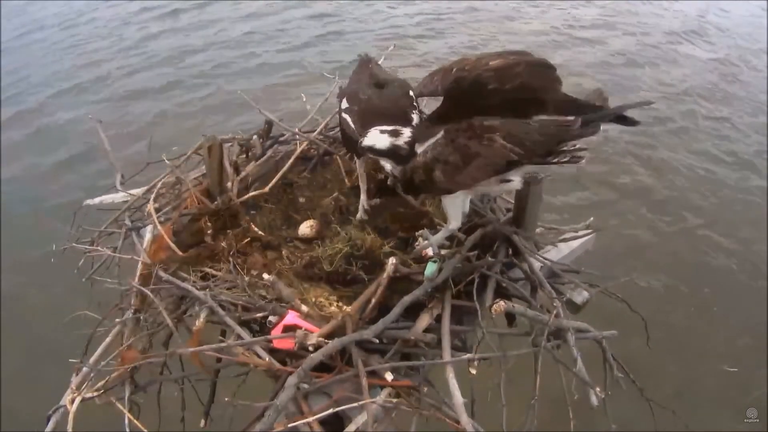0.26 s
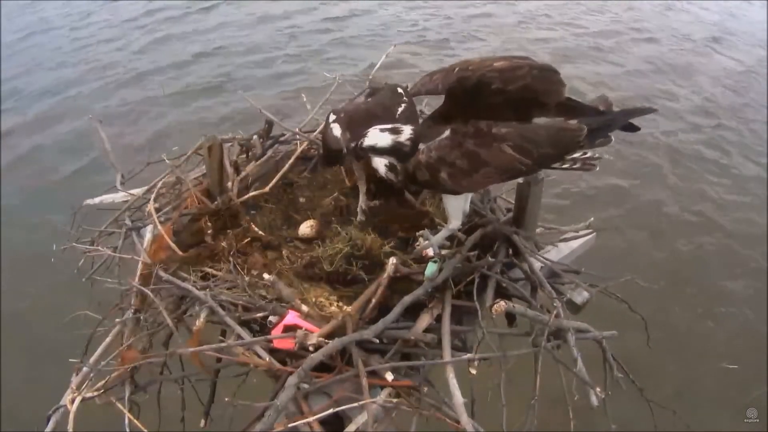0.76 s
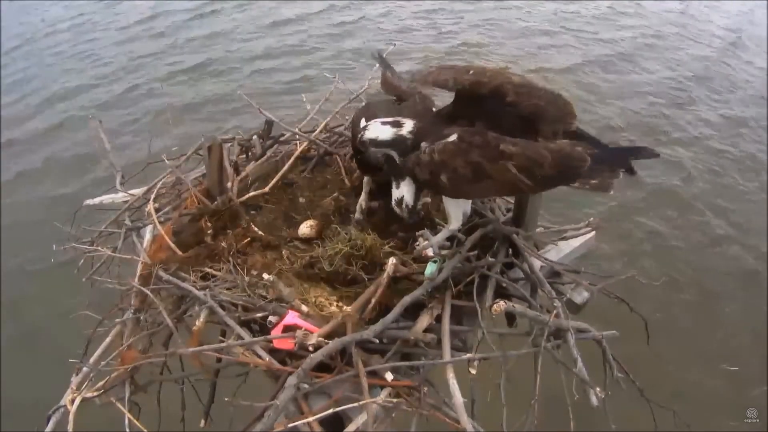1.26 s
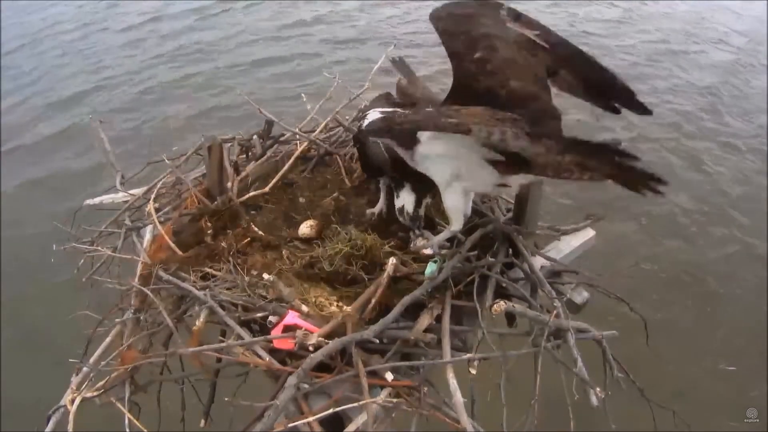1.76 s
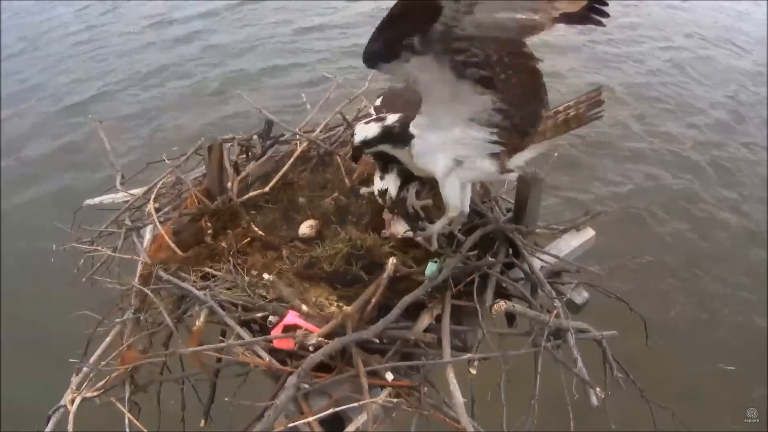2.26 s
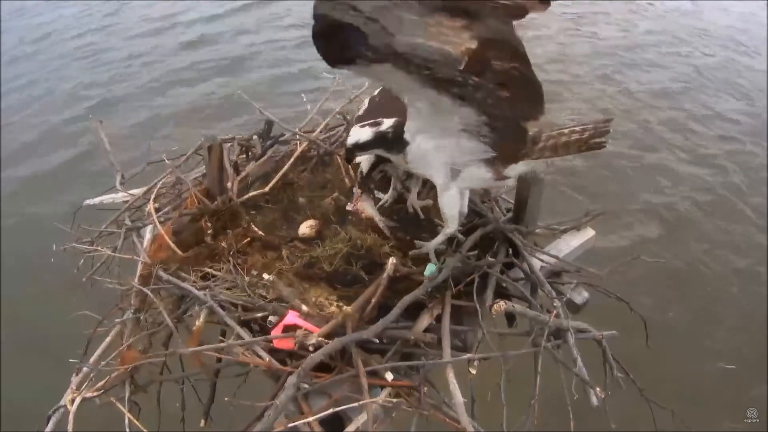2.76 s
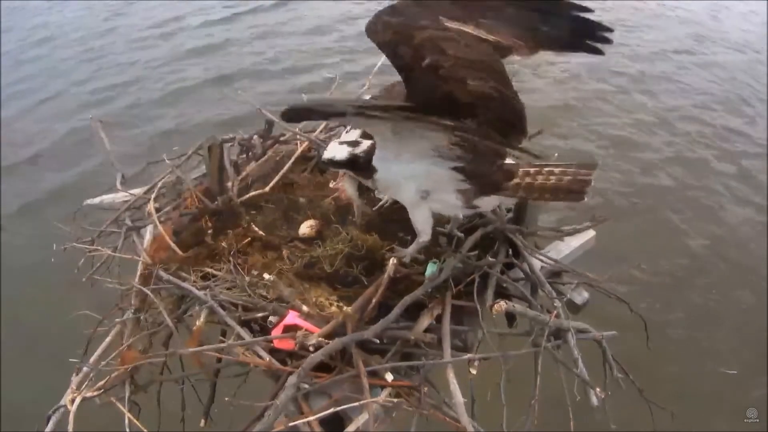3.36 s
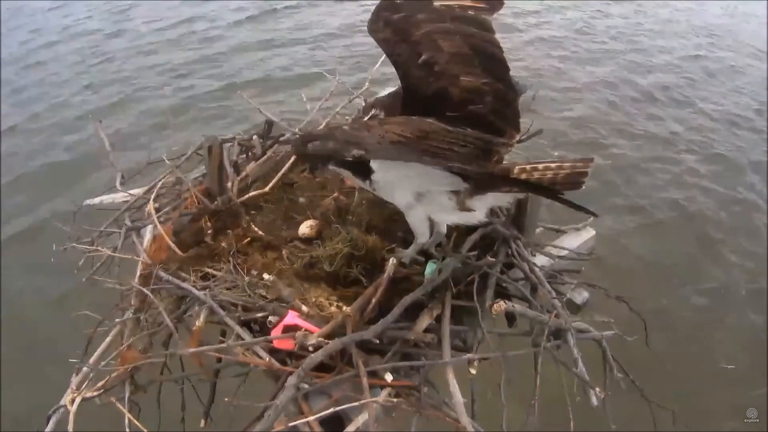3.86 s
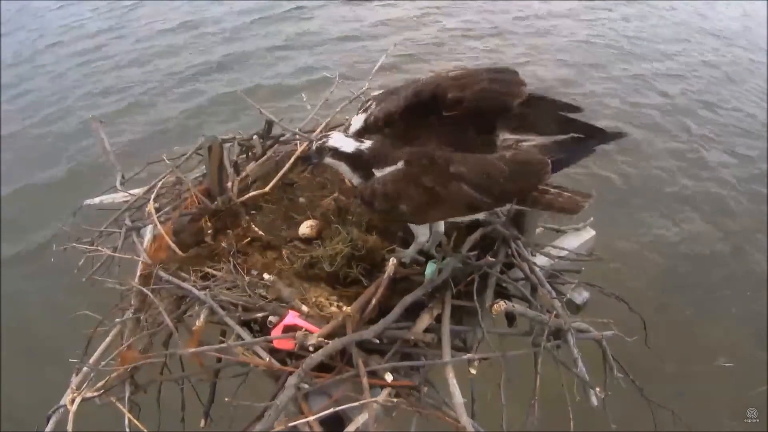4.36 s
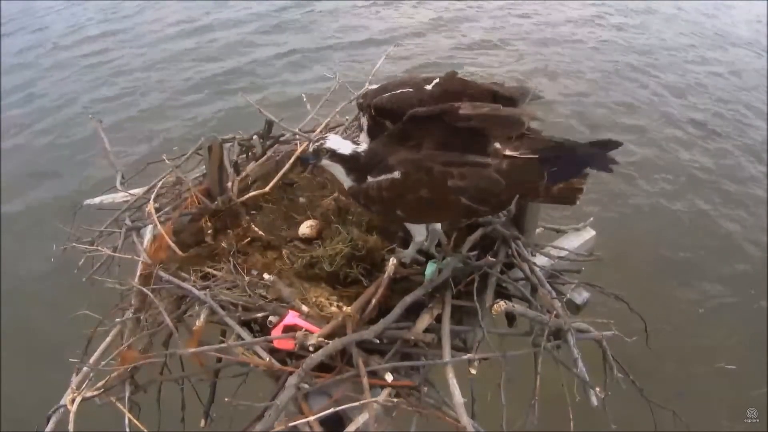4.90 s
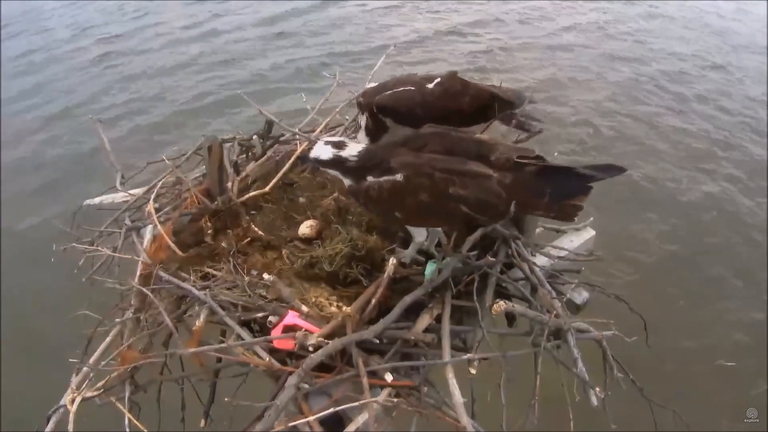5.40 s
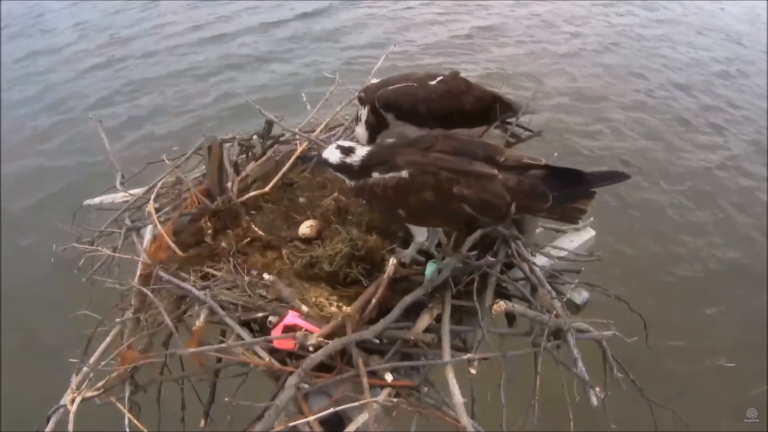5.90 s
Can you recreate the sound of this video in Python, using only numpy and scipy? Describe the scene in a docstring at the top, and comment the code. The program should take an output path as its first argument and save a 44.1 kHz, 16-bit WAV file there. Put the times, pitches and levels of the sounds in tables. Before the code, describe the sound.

Ospreys call from a stick nest above open water, close to a small camera microphone. A fast run of sharp, high chirps comes first, then a brief pause and a few more. Five slower, longer whistles follow, each cracking into a rasp and ending in a short falling yelp, the last one weaker. Soft wingbeats and a few faint twig ticks sound underneath, over a low, steady breeze and hiss.

```python
"""Two ospreys call from a stick nest above open water, close to a small nest camera.
Air pushed through the voice box makes fast, sharp chirps, then long whistles (a tone plus its octave)
that crack into a rasp and end in a falling yelp. Wings beat and twigs tick over a low breeze.
The camera's housing rings faintly, and its sound drops out now and then."""
import sys
import numpy as np
from scipy import signal
from scipy.fft import rfft, irfft
from scipy.io import wavfile

SR = 44100
rng = np.random.default_rng(int(sys.argv[2]) if len(sys.argv) > 2 else 0)


def master(y):
    """Save y as 16-bit WAV."""
    cut = np.clip(np.atleast_2d(y).T, -1, 1)
    pcm = np.round(cut * 32767)  # scale
    wavfile.write(sys.argv[1], SR, pcm.astype(np.int16))


N = 270774
TIME = np.arange(N) / SR
FREQS = np.arange(N // 2 + 1) * SR / N


def chirps(jitter=0.037, flutter_db=7.0, shimmer_db=0.5, lock_db=9, octave_db=-7, octave_below_hz=3000):
    """The voice box sings short notes: pure when the tone is strong, shaky when rushing air takes over."""
    out = np.zeros(N)
    waver, flutter = wander(rate_hz=740), wander(rate_hz=210)
    flow_db = airflow()
    for span, fade, hz, db in [*peeps(), *slides()]:
        shaky = 1 / (1 + undb(db - flow_db[span] - lock_db))  # 0 is pure, 1 is broken
        phase = 2 * np.pi * np.cumsum(hz * (1 + jitter * shaky * waver[span])) / SR
        # the throat lets overtones through on low notes only
        overtones = undb(octave_db) / (1 + (hz / octave_below_hz) ** 16)
        tone = np.sin(phase) + overtones * (np.sin(2 * phase) + undb(-14) * np.sin(3 * phase))
        tremble_db = (shimmer_db + flutter_db * shaky) * flutter[span]
        out[span] += np.sqrt(2) * fade * undb(db + tremble_db) * tone
    return out


# high notes of the chirps: (time [s], length [s], top pitch [Hz], mid level [dB], start-to-end rise [dB])
HIGH_NOTES = [(0.078, 0.038, 4540, -37.5, 14.5), (0.154, 0.057, 4790, -30.5, 3),
              (0.308, 0.039, 4536, -34, -3.5), (0.402, 0.055, 4814, -24.5, -3.5),
              (0.648, 0.064, 4830, -26, -6), (.807, 0.017, 4490, -35.5, -1),
              (.865, 0.017, 4490, -27.5, -4.5), (0.885, 0.041, 4680, -33.5, -5),
              (1.034, 0.03, 4480, -33, 0), (1.115, 0.035, 4506, -27.5, 19), (1.148, 0.051, 4690, -29, -19),
              (1.295, 0.019, 4440, -41, -6), (1.398, 0.089, 5220, -43.5, 4)]


def peeps(drop_hz=455, drop_s=0.03, edge_db=19.5):
    """Pitch and level rise and fall in an arch; the pitch is drop_hz lower at drop_s from the top."""
    for s, length, top_hz, db, rise_db in HIGH_NOTES:
        span, progress, fade = note(s - length / 2, s + length / 2, fade_s=0.003)
        hz = top_hz - drop_hz * ((TIME[span] - s) / drop_s) ** 2
        arch_db = -edge_db * abs(2 * progress - 1) ** 2.23
        yield span, fade, hz, db + rise_db * (progress - 0.5) + arch_db


# quick slides around the peeps:
# (time [s], rise [s], fall [s], first pitch [Hz], last pitch [Hz], peak level [dB])
SLIDING_NOTES = [(0.194, 0.016, 0.014, 3070, 2520, -60.5), (.275, 0.0072, 0.012, 2840, 2990, -49.5),
                 (0.345, 0.012, 0.013, 4620, 5120, -41.5), (0.366, 0.023, 0.0068, 4400, 3040, -42.5),
                 (.443, 0.034, .014, 3300, 2520, -52), (.523, 0.016, 0.017, 2690, 2920, -44.5),
                 (0.598, 0.018, 0.0092, 5500, 4450, -36.5), (.611, 0.02, 0.007, 4100, 3110, -43),
                 (.693, .01, 0.0075, 2970, 2630, -58), (.789, .01, 0.0097, 4780, 5500, -57),
                 (.833, 0.014, .011, 4300, 3860, -52.5), (.849, 0.01, 0.0085, 3770, 3130, -50.5),
                 (0.92, 0.019, 0.014, 3100, 2600, -54), (1.004, 0.0092, 0.01, 2790, 3020, -41),
                 (1.074, 0.014, 0.014, 4150, 3800, -39), (1.089, 0.0086, .008, 3590, 3120, -44),
                 (1.184, 0.015, 0.015, 2910, 2536, -41), (1.264, 0.0086, 0.012, 2800, 2995, -37.5),
                 (1.28, .008, .008, 4930, 5480, -52), (1.334, 0.024, 0.017, 4230, 4010, -45),
                 (1.365, 0.041, 0.018, 4160, 4520, -39.5), (1.458, 0.021, 0.018, 2860, 2430, -46.5),
                 (1.722, 0.0084, 0.026, 2720, 2415, -45.5), (1.913, 0.0089, 0.014, 4090, 3080, -44),
                 (1.988, .013, 0.0098, 4000, 3360, -51), (2.001, 0.011, 0.028, 2647, 2430, -32.5),
                 (2.147, 0.0054, 0.029, 2520, 3080, -34), (2.206, 0.017, 0.012, 5050, 6450, -44),
                 (2.241, 0.0079, 0.02, 4170, 4000, -42), (2.257, 0.011, .007, 3720, 3000, -37),
                 (2.322, .007, 0.012, 3310, 2930, -39), (2.335, 0.0042, 0.013, 2720, 2493, -26),
                 (3.051, 0.0041, 0.011, 2670, 2420, -54)]


def slides(bend=1.4):
    """The pitch slides quickly, then settles, while the level climbs to a point and falls."""
    for s, rise, fall, first_hz, last_hz, db in SLIDING_NOTES:
        span, progress, fade = note(s - rise, s + fall, fade_s=0.0032)
        hz = last_hz + (first_hz - last_hz) * (1 - progress) ** bend
        yield span, fade, hz, db + peak_shape(TIME[span] - s, rise, fall)


def whistles():
    """Long, clean notes with a strong octave; the yelps that end them are rougher."""
    clean = tone_and_octave([*lead_ins(), *held_notes()], jitter=0.002, flutter_db=0.84)
    return clean + tone_and_octave(yelps(), jitter=0.011, flutter_db=2.85)


def tone_and_octave(notes, jitter, flutter_db):
    """Play each note with its octave (twice the pitch), a little unsteady in pitch and level."""
    out = np.zeros(N)
    waver, flutter = wander(rate_hz=840), wander(rate_hz=100)
    for span, fade, hz, db, octave_db in notes:
        phase = 2 * np.pi * np.cumsum(hz * (1 + jitter * waver[span])) / SR
        tone = undb(db) * np.sin(phase) + undb(octave_db) * np.sin(2 * phase)
        out[span] += np.sqrt(2) * fade * undb(flutter_db * flutter[span]) * tone
    return out


# low note that opens each whistle: (time [s], pitch [Hz], peak level [dB], octave level [dB])
OPENING_NOTES = [(2.587, 2010, -43.5, -44.5), (3.204, 2060, -36, -41), (3.773, 2197, -40.5, -68),
                 (4.419, 2137, -37.5, -51), (5.746, 2030, -47.5, -58)]


def lead_ins(rise_s=0.013, fall_s=0.0075, climb_hz_per_s=9000):
    """A brief rising note before the voice jumps up to the whistle."""
    for s, hz, db, octave_db in OPENING_NOTES:
        span, _, fade = note(s - rise_s, s + fall_s)
        t = TIME[span] - s
        shape_db = peak_shape(t, rise_s, fall_s)
        yield span, fade, hz + climb_hz_per_s * t, db + shape_db, octave_db + shape_db


# one list of points for each whistle: (time [s], pitch [Hz], level [dB], octave level [dB])
WHISTLE_PATHS = [
    [(2.592, 2900, -41.5, -44), (2.598, 2793, -42.5, -47), (2.638, 2843, -51.0, -37.5),
     (2.668, 2832, -43.5, -39.0), (2.714, 2933, -36, -43.0), (2.762, 2950, -38.0, -46),
     (2.772, 2998, -40.0, -37.5), (2.802, 3029, -42, -38.5), (2.82, 3121, -38, -58)],
    [(3.211, 2850, -43, -46.5), (3.237, 2912, -40.5, -43.5), (3.267, 2897, -42.5, -45),
     (3.293, 2844, -43.5, -55), (3.367, 2901, -41, -46.5), (3.399, 2944, -44, -51.5),
     (3.419, 3040, -48, -41), (3.475, 3068, -41, -49.5), (3.489, 3240, -45, -66)],
    [(3.777, 2850, -45, -49.5), (3.793, 2916, -47.5, -43.5), (3.821, 2950, -45, -50.5),
     (3.855, 2897, -47, -43), (3.869, 2867, -44.5, -50), (3.891, 2876, -42.5, -50), (3.959, 2904, -50, -44),
     (3.975, 3030, -48, -37.5), (3.983, 3020, -56, -57)],
    [(4.427, 2850, -42, -45.5), (4.445, 2900, -42, -40.5), (4.489, 2826, -41, -44),
     (4.605, 2944, -44.0, -57.5), (4.611, 2963, -44, -49), (4.669, 3038, -46.5, -35.5),
     (4.689, 3046, -43.5, -39), (4.701, 3088, -35.5, -43.5), (4.711, 3208, -44.5, -54)],
    [(5.757, 2794, -47.5, -59.5), (5.769, 2806, -40.5, -54.5), (5.789, 2840, -43, -53.5),
     (5.821, 2796, -40.5, -54.5), (5.845, 2805, -38.0, -48), (5.865, 2858, -41, -61.5),
     (5.881, 2922, -50, -45), (5.937, 2967, -61, -56.5), (6.007, 2992, -58.5, -61.5)],
]


def held_notes(edge_s=0.005):
    """The long part of each whistle creeps up in pitch as the pressure builds."""
    for path in WHISTLE_PATHS:
        times, *columns = np.transpose(path)
        span, _, fade = note(times[0] - edge_s, times[-1] + edge_s, edge_s)
        hz, db, octave_db = (np.interp(TIME[span], times, column) for column in columns)
        yield span, fade, hz, db, octave_db


# yelp that ends each whistle:
# (time [s], rise [s], fall [s], peak level [dB], octave level [dB], airflow [dB])
CLOSING_YELPS = [(2.871, .021, 0.039, -35, -36.5, -47.5), (3.579, .011, 0.034, -38, -34, -51.5),
                 (4.114, .004, 0.035, -37.5, -36.5, -50.5), (4.815, .014, .033, -36, -36, -57),
                 (6.138, 0.0079, 0.021, -44.5, -55, -58.5)]


def yelps(from_hz=2906, to_hz=2728, bend=1.35):
    """The voice catches again and drops as the pressure goes; the octave swells more briefly."""
    for s, rise, fall, db, octave_db, _ in CLOSING_YELPS:
        span, _, fade = note(s - rise, s + fall)
        t = TIME[span] - s
        hz = to_hz + (from_hz - to_hz) * np.maximum(1 - t / fall, 0) ** bend
        before, after = np.maximum(-t / rise, 0), np.maximum(t / fall, 0) ** 3
        yield span, fade, hz, db - 11 * before - 16.5 * after, octave_db - 22 * before - 34.5 * after


# hoarse tones: (start [s], end [s], pitch [Hz], width [Hz], level [dB])
HOARSE_TONES = [(0.53, 0.572, 4340, 302, -48), (2.147, 2.203, 3100, 300, -50),
                (2.21, 2.252, 5700, 600, -45.5), (2.276, 2.317, 4900, 500, -62),
                (2.606, 2.76, 4770, 170, -55.5), (2.81, 2.868, 3100, 111, -49.5),
                (2.815, 2.87, 4040, 240, -52), (2.778, 2.87, 4530, 110, -54), (3.486, 3.58, 3240, 80, -54),
                (3.488, 3.579, 4136, 120, -50), (3.983, 4.113, 3220, 90, -58),
                (3.986, 4.057, 3994, 109, -49), (4.049, 4.116, 4075, 110, -45),
                (4.709, 4.817, 3240, 80, -55), (4.712, 4.818, 4220, 168, -50),
                (4.725, 4.816, 4700, 202, -55), (5.928, 6.14, 4780, 90, -66),
                (6.007, 6.149, 3900, 160, -63.5), (5.964, 6.16, 2980, 302, -64.5)]


def cracks():
    """Blown too hard, the voice breaks into unsteady tones at unrelated pitches."""
    return sum(undb(db) * gate(TIME, start, end, fade_s=0.0096) * noise(abs(resonance(hz, 2 * w)) ** 3)
               for start, end, hz, w, db in HOARSE_TONES)


# set pitches that colour the rasp:
# (pitch [Hz], rough width [Hz], relative level in chirps [dB], relative level in whistles [dB])
RASP_RINGS = [(2068, 86, -20.5, 1), (2326, 670, -20.5, -8), (2406, 60, -6.5, 4.5), (2720, 250, -11, -21.5),
              (3178, 200, -2, -5.5), (3777, 120, -2.5, -13), (4003, 150, -4.5, -5), (4472, 61, 6, -3.5),
              (4790, 130, -1, -7.5), (4990, 140, -6, -9), (5404, 270, -0.5, -6.5), (5834, 220, -7, -0.5),
              (6080, 110, -4.5, -9), (6350, 460, -16.5, -13.5), (6890, 210, -4, -6.5),
              (7160, 360, -17, -18.5), (7620, 300, -13.5, -20.5)]


def rasp(chirp_db=1, whistle_db=2, chirp_grain_db=3, whistle_grain_db=2, whistles_from_s=2.5):
    """The birds' breathy rasp, coloured by the camera's case ringing at set pitches."""
    pitches, widths, *levels = np.transpose(RASP_RINGS)
    shapes = np.array([abs(resonance(hz, 2 * width)) ** 10 for hz, width in zip(pitches, widths)])
    # brighter and grainier in the chirps than in the whistles
    bright, dark = (noise(np.sqrt(undb(db) ** 2 @ shapes)) for db in levels)
    grain = wander(rate_hz=135)
    bright = bright * undb(chirp_db + chirp_grain_db * grain)
    dark = dark * undb(whistle_db + whistle_grain_db * grain)
    return undb(airflow()) * np.where(TIME < whistles_from_s, bright, dark)


def airflow():
    """How hard the breath rushes, in dB: the strongest puff or stream at each moment."""
    return np.max([*puffs(), *streams()], axis=0)


# breaths that drive the chirps: (time [s], rise [s], fall [s], peak airflow [dB])
CHIRP_BREATHS = [(.16, 0.043, 0.031, -56), (.3, 0.029, 0.018, -60.5), (.363, 0.017, 0.023, -53.5),
                 (.41, 0.051, 0.033, -51), (.527, 0.012, 0.047, -57), (.608, 0.038, .024, -49),
                 (0.654, 0.056, 0.033, -49.5), (.878, 0.035, 0.037, -54.5), (1.01, .012, 0.043, -52.5),
                 (1.088, 0.029, 0.018, -50), (1.151, .052, 0.03, -49), (1.265, 0.014, 0.088, -59),
                 (1.39, 0.047, 0.064, -53.5), (1.91, 0.0065, 0.0078, -46.5), (1.997, 0.0093, 0.01, -46),
                 (2.152, 0.0059, 0.022, -52.5), (2.25, 0.066, 0.069, -52.5), (2.32, 0.062, 0.023, -45.5)]


def puffs(edge_db=10):
    """Each short puff of air swells to a rounded peak and dies away."""
    for s, rise, fall, db in CHIRP_BREATHS:
        yield db - edge_db * np.maximum((s - TIME) / rise, (TIME - s) / fall) ** 2


# breath behind each whistle: (airflow at the start [dB], airflow just before the yelp [dB])
WHISTLE_BREATHS = [(-51, -58.5), (-53.5, -60), (-55, -60.5), (-53.5, -56), (-66.5, -70.5)]


def streams(push_s=0.013, rise_db_per_s=1199, fall_db_per_s=646.5):
    """A long breath weakens through each whistle, then gives a last push for the yelp."""
    def stream(start, end, db):
        early, late = np.maximum(start - TIME, 0), np.maximum(TIME - end, 0)
        return db - rise_db_per_s * early - fall_db_per_s * late
    for path, sag_db, yelp in zip(WHISTLE_PATHS, WHISTLE_BREATHS, CLOSING_YELPS):
        start_s = path[0][0]
        yelp_s, _, fall, _, _, push_db = yelp
        yield stream(start_s, yelp_s, np.interp(TIME, (start_s, yelp_s), sag_db))
        yield stream(yelp_s - push_s, yelp_s + fall / 2, push_db)


def surroundings(voice, ring_db=-11, echo_db=-24, echo_s=0.018):
    """The camera mount rings on after low notes; sticks and water scatter a very short echo."""
    tail = rng.standard_normal(N) * np.exp(-TIME / echo_s) * (TIME > 0.003)
    echo = undb(echo_db) * rfft(tail / np.sqrt(np.sum(tail ** 2)))
    mount = undb(ring_db) * resonance(hz=2550, width_hz=9)
    return irfft(rfft(voice) * (1 + mount + echo), N)


# wing strokes: (time [s], swell time [s], centre pitch [Hz], peak level [dB])
WING_STROKES = [(1.85, 0.39, 36, -64.5), (1.95, 0.096, 241, -66), (2.399, 0.04, 250, -62.5),
                (2.421, 0.13, 42, -61.5), (2.624, 0.046, 263, -60.5), (2.623, 0.039, 800, -65),
                (2.713, 0.15, 38, -60.5), (3.501, 0.23, 40, -61.5), (3.615, 0.022, 218, -50.5),
                (4.125, 0.057, 43.5, -49.5), (4.92, 0.059, 34, -60)]


def wings():
    """Each stroke pushes a soft, low swell of swirling air at the microphone."""
    return sum(undb(db) * swell(s, swell_s) * noise(abs(resonance(hz, 0.54 * hz)) ** 1.7)
               for s, swell_s, hz, db in WING_STROKES)


# twigs under the birds' claws: (time [s], level [dB])
TWIG_TICKS = [(1.684, -58), (1.762, -60.5), (2.612, -53), (3.03, -76), (3.047, -58), (3.602, -51.5),
              (3.689, -67)]


def twigs(decay_s=0.01):
    """Dry sticks shift with short, dull ticks."""
    ticks = sum(undb(db) * (TIME > s) * np.exp(-abs(TIME - s) / decay_s) for s, db in TWIG_TICKS)
    return ticks * noise(abs(resonance(hz=2000, width_hz=5000)))


# breeze, water and hiss, from low to high: (frequency [Hz], relative level [dB])
AIR_COLOUR = [(10, -18.5), (24, -4.5), (36, 8), (52, -2.5), (72, 0), (105, -3.5), (200, -6), (400, -12),
              (700, -17), (1100, -17.5), (1800, -23), (2800, -21.5), (3800, -26), (6400, -24.5),
              (7400, -26.5)]


def breeze(level_db=-59.5, gust_db=-0.2, bass_below_hz=450):
    """A breeze over the water swells very slightly in the bass, under a steady hiss."""
    hz, db = np.transpose(AIR_COLOUR)
    colour = undb(np.interp(np.log(FREQS + 1), np.log(hz), db))
    spectrum = rfft(noise(colour))
    bass = 1 / (1 + (FREQS / bass_below_hz) ** 2)
    rumble = irfft(spectrum * bass, N) * undb(gust_db * wander(rate_hz=2.7))
    hiss = irfft(spectrum * (1 - bass), N)
    return undb(level_db) * (rumble + hiss)


# pitches at which the camera's case rings: (pitch [Hz], width [Hz], relative level [dB])
HOUSING_RINGS = [(1214, 34, -1), (1619, 23, -4.5), (2027, 27, -11.5), (2460, 25, -11.5), (2833, 100, -13),
                 (3140, 25, -5.5), (4760, 340, -21), (5500, 380, -16)]


def housing(level_db=-69, brush_at_s=1.97, brush_db=13):
    """The camera's case gives a faint, hollow ring, louder for a moment when a wing brushes the mount."""
    power = sum(abs(undb(db) * resonance(hz, width)) ** 2 for hz, width, db in HOUSING_RINGS)
    return undb(level_db + brush_db * swell(brush_at_s, swell_s=0.02)) * noise(np.sqrt(power))


def note(start, end, fade_s=0.0014):
    """A note's sample numbers, its progress from 0 to 1, and its fade in and out."""
    span = np.flatnonzero((TIME > start) & (TIME < end))
    return span, (TIME[span] - start) / (end - start), gate(TIME[span], start, end, fade_s)


def peak_shape(t, rise_s, fall_s, edge_db=14.5):
    """Level in dB of a short note that grows until t = 0 and then dies away."""
    return -edge_db * np.maximum(-t / rise_s, t / fall_s) ** 1.22


def swell(s, swell_s):
    """A bell-shaped rise and fall around time s."""
    return np.exp(-((TIME - s) / swell_s) ** 2)


def gate(t, start, end, fade_s):
    """1 between start and end, 0 outside, with rounded edges."""
    return np.sin(np.pi / 2 * np.clip(np.minimum(t - start, end - t) / fade_s, 0, 1)) ** 2


def resonance(hz, width_hz):
    """A filter that rings at one pitch, where its gain is 1; narrower rings longer."""
    return 1j * FREQS * width_hz / (hz ** 2 - FREQS ** 2 + 1j * FREQS * width_hz)


def noise(gain):
    """Noise shaped by a gain at each frequency, then scaled to a typical size (rms) of 1."""
    shaped = irfft(rfft(rng.standard_normal(N)) * gain, N)
    return shaped / np.sqrt(np.mean(shaped ** 2))


def wander(rate_hz):
    """A smooth random wobble of typical size 1, moving up to about rate_hz."""
    return noise(np.exp(-(FREQS / rate_hz) ** 2))


def undb(db):
    """Turn decibels into a number to multiply by."""
    return 10 ** (np.asarray(db) / 20)


def scene():
    """The ospreys' calls, with wings, twigs, open air and the ringing case, in one channel."""
    voice = chirps() + whistles() + cracks() + rasp()
    return (surroundings(voice) + wings() + twigs() + breeze() + housing())[None]


# gaps in the camera's sound: (start [s], end [s])
SOUND_GAPS = [(4.511, 4.525), (5.085, 5.099), (6.047, 6.061)]


def record(dry, stop_hz=8250):
    """The camera loses a few short stretches of sound and cuts off the highest treble."""
    live = 1 - sum(gate(TIME, start, end, fade_s=0.0005) for start, end in SOUND_GAPS)
    treble_cut = signal.cheby2(14, 60, stop_hz, fs=SR, output="sos")
    return signal.sosfilt(treble_cut, dry * live)


dry = scene()
out = record(dry)
master(out)
```